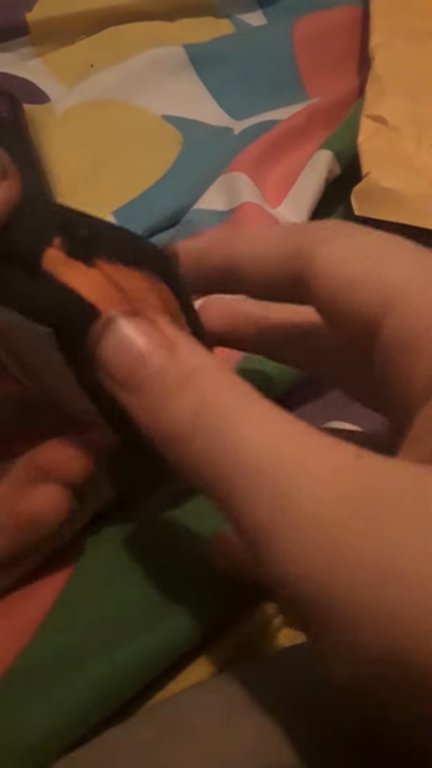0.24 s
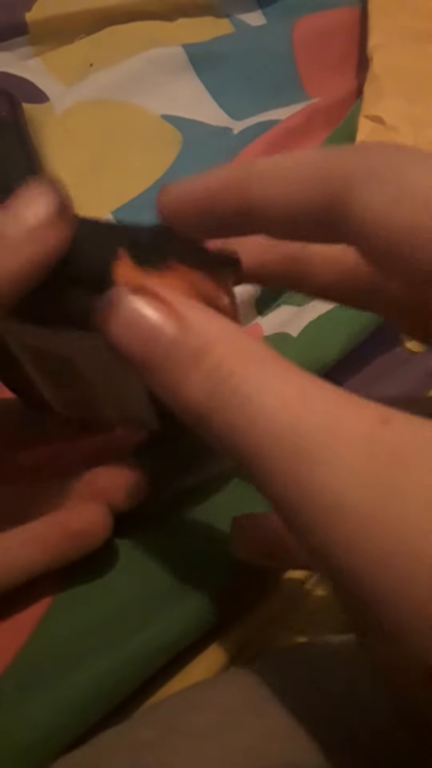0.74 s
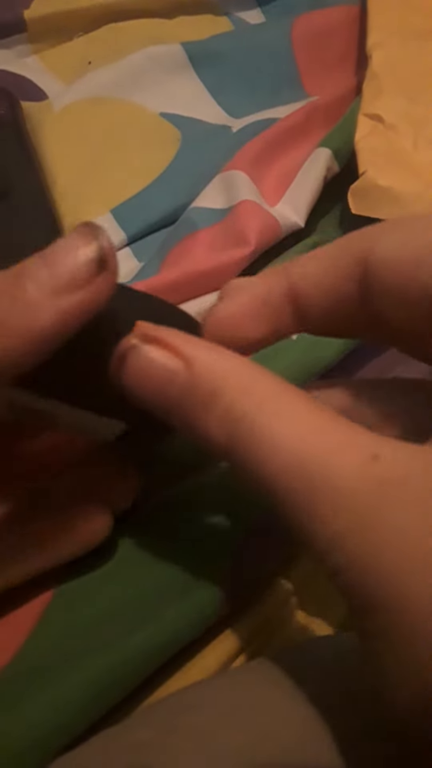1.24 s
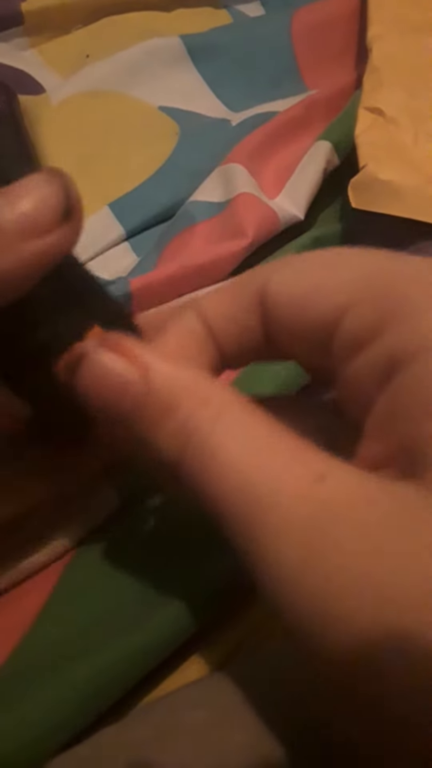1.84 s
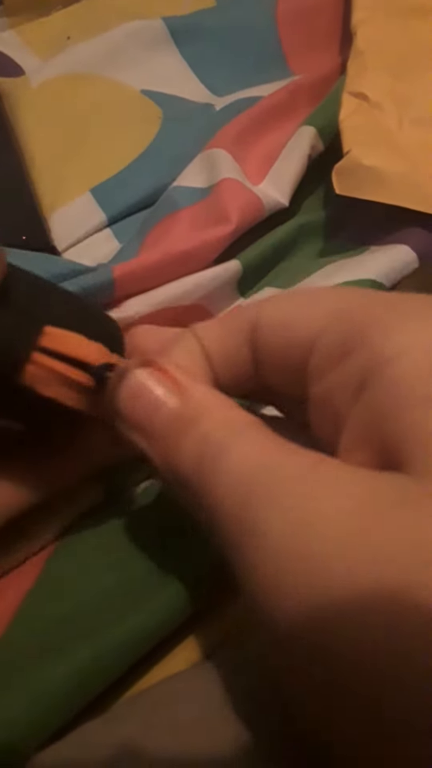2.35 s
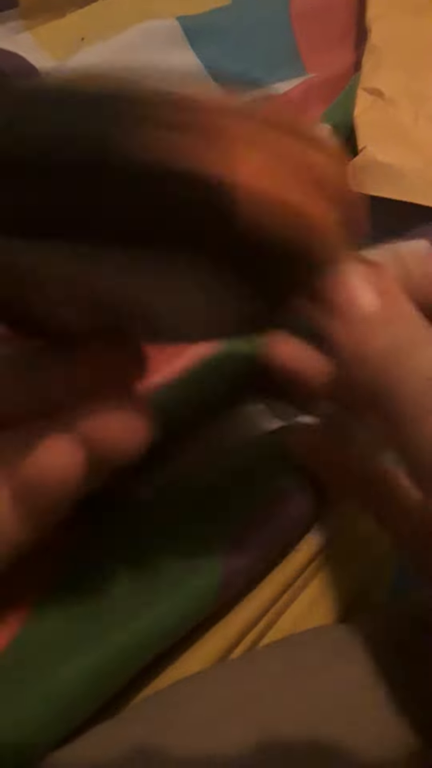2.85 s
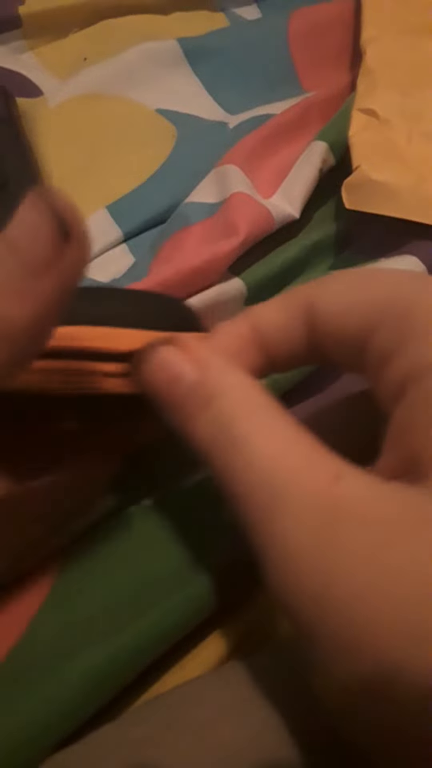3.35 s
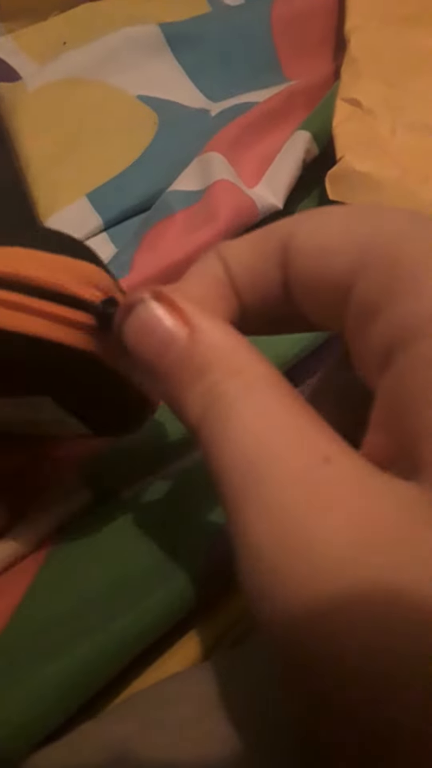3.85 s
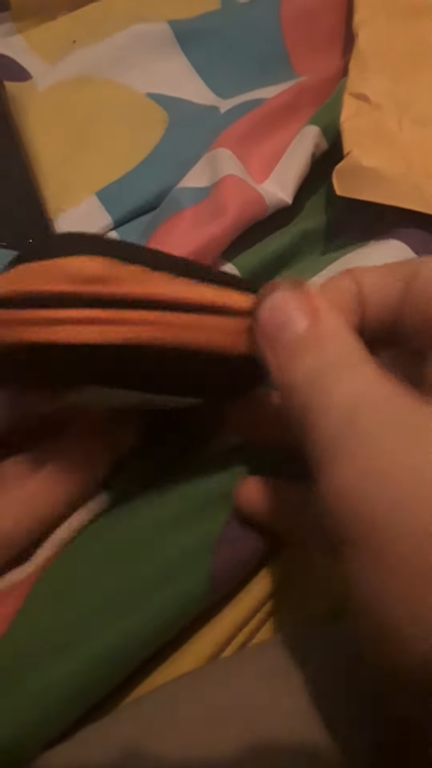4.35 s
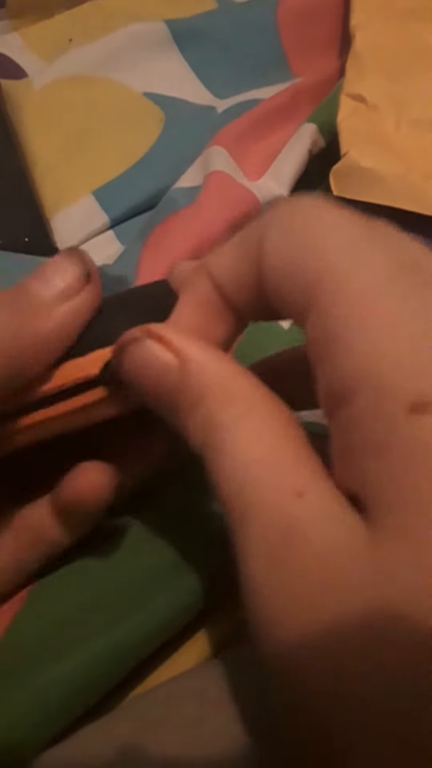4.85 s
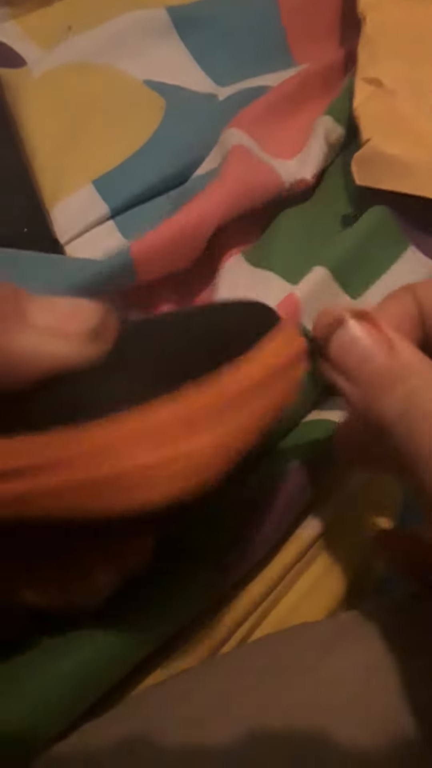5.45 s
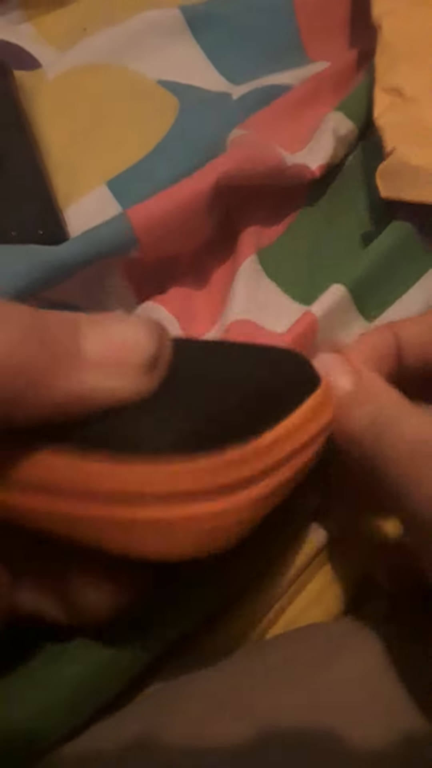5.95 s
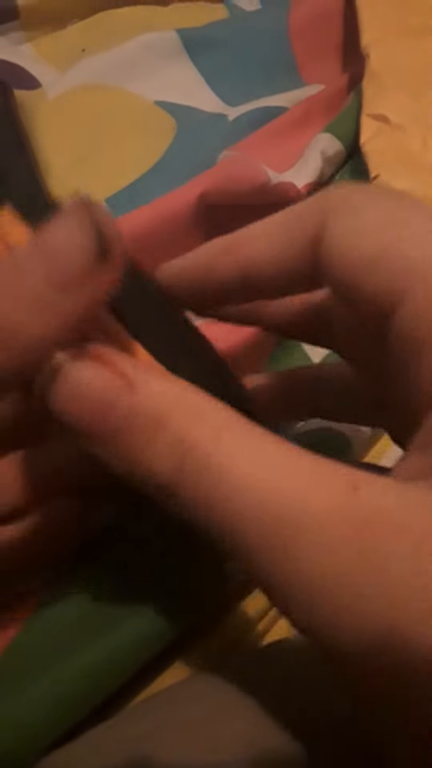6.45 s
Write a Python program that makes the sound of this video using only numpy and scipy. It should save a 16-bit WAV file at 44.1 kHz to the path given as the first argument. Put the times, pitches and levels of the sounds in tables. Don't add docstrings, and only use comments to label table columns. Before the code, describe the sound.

A fabric case handled close to the microphone indoors: fumbling clicks at once, over a second of quiet rubbing and small ticks, one crisp tap, then three halting zipper pulls about a second or more apart. The first is bright and strong, the second softer and quick, the third longer and gritty. Cloth scuffs and fingertip taps fill the gaps; rustling, creaking handling closes it over soft room rumble.

```python
import sys
import numpy as np
from scipy import signal
from scipy.fft import rfft, irfft
from scipy.io import wavfile
from scipy.ndimage import uniform_filter1d, map_coordinates

SR = 44100
rng = np.random.default_rng(int(sys.argv[2]) if len(sys.argv) > 2 else 0)


def nominal_scale(level):
    x = np.asarray(level, float) / 20
    return 10 ** x


def store_pcm(level_fs):
    pcm = np.round(np.clip(level_fs, -1, 1) * 32767).astype(np.int16)
    wavfile.write(sys.argv[1], SR, np.atleast_2d(pcm).T)


N = 295931


def zipper():
    # time_s, brace_db, wall_pitch_ratio
    grips = [
        [(2.21, -21, 1.1), (2.4, -15, 1.01), (2.44, 1, 1.2), (2.49, 6, 1.15), (2.55, 2, 1.3), (2.58, 9, 0.76),
         (2.625, 8, 0.8), (2.655, -2.5, 0.88), (2.72, 4, 1.3)],
        [(3.67, 5.5, .55), (3.72, 8, .55), (3.77, 0, 0.84), (3.85, -2, .58), (3.92, 1.5, .5), (3.96, 5, 0.69),
         (4, 2, 1.02), (4.022, 3, 1.6), (4.05, -4, 1.04)],
        [(5.15, -2, 1.3), (5.2, -11, 1.2), (5.24, 8, 0.69), (5.28, 0.5, .95), (5.36, -0.5, .85),
         (5.43, -6, 1.12), (5.5, 5, 1.35), (5.6, 5, 1.2), (5.64, 5, .95)],
    ]
    # time_s, tape_db, second_tape_db, slider_ring_db, pitch_ratio
    tape_lies = [
        [(2.21, -12, -3, -14, 1.), (2.3, -11, -1, -14, 1.), (2.4, -11, 3, -10, 1.), (2.46, -3, 3, 2, 1.),
         (2.5, 3, -1, -3, 1.1), (2.55, -2, 5, -4, 1.), (2.6, -4, 0, -2, 1.), (2.65, -8, 1, -6, .95),
         (2.72, -8, 2, -10, .95)],
        [(3.67, -5, -3, -1, 1.1), (3.72, -5, -1, 1, .95), (3.77, -6, 3, -6, .9), (3.82, -3, 6, -12, .95),
         (3.87, 0, 7, -12, 1.), (3.92, 1, 2, -6, 1.), (3.97, 3, 2, 2, 1.1), (4.01, 1.5, -1, -2, 1.2),
         (4.05, 1, -3, -8, 1.)],
        [(5.15, -4, 2, -14, 1.), (5.21, -4, 1, -12, 1.), (5.25, -8, 0, -5, .95), (5.29, 3, -8, 0, .98),
         (5.35, 2, -9, 1, .96), (5.44, 8, -9, 1, 1.), (5.49, 6, 6, 4, 1.), (5.55, 4, 6, 7, .95),
         (5.63, 2, 7, 7, .92)],
    ]
    # pitch_hz, level_db (per Hz)
    snap_colours = [
        [(2820, -78), (5000, -23), (7470, -0.5), (8000, 1), (8740, -3), (9850, -13), (14900, -40), (16700, -54)],
        [(2820, -44), (5000, -21), (8210, 5.5), (8920, -4.5), (9800, -17), (14300, -37), (16000, -45),
         (16700, -78)],
        [(2820, -30), (4800, -25), (6590, -10.5), (8210, 3), (9400, -14), (15200, -39), (16000, -35),
         (16700, -71)],
    ]
    # pitch_hz, width_hz
    case_modes = [
        [(366, 320), (753, 340), (1335, 430), (2250, 800), (3350, 1600), (6500, 1200)],
        [(400, 260), (790, 340), (1240, 380), (2400, 1400), (4300, 1300), (5600, 1800)],
        [(340, 750), (670, 420), (1250, 1000), (2800, 640), (5300, 1800), (11000, 3200)],
    ]
    # thump_db, wall_db, shell_db, tape_db, second_tape_db, slider_ring_db
    mean_knocks = [
        (-20, -21, -17.5, -23.5, -16.5, -8),
        (-20, -11, -20, -13, -20, -16),
        (-25, -16.5, -16, -13, -14.5, -18.5),
    ]
    slides = [
        (-36, -52.5, .3, .3, .4),
        (-35, -58, .35, .35, .2),
        (-38, -53, .45, .45, .1),
    ]
    grip_share = (.9, 1.07, .25, -.2, -0.037, 0)
    lag_share = 0.39
    hiss_power = 1.96
    out, t = 0, np.arange(N) / SR
    teeth = slider_teeth()
    pulls = zip(grips, tape_lies, mean_knocks, slides, snap_colours, case_modes)
    for grip, tape, knock_db, slide, snap, case in pulls:
        hiss_db, drag_db, burst_ms, rough, chatter = slide
        in_pull = abs(teeth[:, 0] - grip[4][0]) < .5
        s, db = teeth[in_pull].T
        brace_db, stretch = in_time(grip, s)
        case_db = np.c_[list(knock_db)] + np.outer(grip_share, brace_db) - lag_share * (db - db.mean())
        *tape_db, bow = in_time(tape, s)
        case_db[3:] += tape_db
        pitch_ratios = (1, stretch, 1, bow, bow, 1)
        modes = [(hz * ratio, width_hz) for (hz, width_hz), ratio in zip(case, pitch_ratios)]
        out = out + knocks(s, db + .4, case_db, snap, modes, burst_ms, rough, chatter,
                           detune=.022, rattle=.06, rattle_ms=1.3)
        passed = np.bincount((s * SR).astype(int), minlength=N) * SR / 300.
        speed = np.maximum(uniform_filter1d(uniform_filter1d(passed, size=700), size=700), 0)
        moving = (t > s.min()) & (t < s.max())
        flutter_db = 2 * drift(150)
        strain_db = drag_db + 4 * drift(30)
        friction = nominal_scale(hiss_db) * speed ** hiss_power + nominal_scale(strain_db) * moving
        rub = rng.standard_normal(N) * nominal_scale(flutter_db) * friction
        out = out + through(rub, response(snap) + 0.28 * resonance(*case[3], passes=1))
    return out


def slider_teeth():
    # time_s, level_db
    creep_first = [(2.213, -11.5), (2.2372, -35), (2.2552, -9), (2.2689, -9), (2.2793, -9.5), (2.2927, -8),
                   (2.3045, -34), (2.3301, -8.5), (2.3505, -32), (2.3529, -8), (2.3731, -7), (2.3895, -30),
                   (2.3952, -7), (2.4071, -7), (2.6355, -8), (2.6419, -8), (2.6517, -8), (2.6725, -8.5),
                   (2.6859, -12.5), (2.6971, -15.5), (2.716, -28)]
    creep_second = [(3.673, -32.5), (3.6837, -26.5), (3.6992, -26), (3.7076, -25), (3.7153, -26),
                    (3.724, -29), (3.7299, -25), (3.7405, -22), (3.755, -19), (3.7729, -21), (3.8166, -20),
                    (3.825, -21), (3.8407, -17.5), (3.8557, -19.5), (3.8643, -18.5), (3.8687, -27),
                    (3.8729, -21), (3.883, -22), (3.8993, -24), (3.9165, -25), (3.9207, -23), (3.9239, -19),
                    (3.9264, -27), (3.9303, -20), (3.9332, -24), (3.936, -17), (3.9388, -30), (3.9429, -19),
                    (3.9491, -19), (4.0463, -12.5)]
    creep_third = [(5.1528, -18), (5.1584, -15.5), (5.1684, -16), (5.1753, -16.5), (5.2, -11.5),
                   (5.2121, -16.5), (5.219, -12.5), (5.2235, -15), (5.2275, -14), (5.233, -16),
                   (5.2363, -16), (5.2398, -18), (5.3617, -10.5), (5.3721, -14.5), (5.3892, -8.5),
                   (5.3988, -8.5), (5.408, -9), (5.4223, -10.5), (5.4326, -8), (5.4506, -10.5), (5.459, -7),
                   (5.4682, -18), (5.4756, -20), (5.4839, -17), (5.4904, -15), (5.4994, -14), (5.5058, -14),
                   (5.5132, -12), (5.5208, -13), (5.5474, -16), (5.5915, -15.5), (5.5978, -31),
                   (5.6004, -14.5), (5.6064, -14), (5.6121, -13), (5.6175, -12), (5.6245, -14.5),
                   (5.6326, -22)]
    # time_s, level_db
    runs = [
        [(2.4162, -8.5), (2.437, -10), (2.4718, -10.5), (2.4892, -16)],
        [(2.5001, -19), (2.5081, -21), (2.5304, -14.5), (2.5537, -14), (2.5719, -12), (2.5858, -14.5),
         (2.5983, -11), (2.614, -8), (2.6299, -7)],
        [(3.9543, -18), (3.9696, -18), (3.9769, -24), (3.9827, -19), (3.9942, -14.5), (4.0044, -11.5),
         (4.0141, -13.5), (4.0297, -9)],
        [(5.2431, -17), (5.2514, -18), (5.2625, -14.5), (5.2752, -16), (5.2854, -22), (5.3005, -20.5),
         (5.328, -12), (5.3417, -10), (5.3555, -9.5)],
    ]
    run_counts = [
        [0, 4, 9, 11],
        [0, 1, 4, 8, 12, 16, 20, 25, 29],
        [0, 4, 6, 8, 12, 16, 20, 25],
        [0, 4, 8, 12, 15, 20, 28, 32, 36],
    ]
    running = [run_teeth(run, count) for run, count in zip(runs, run_counts)]
    return np.concatenate([creep_first, creep_second, creep_third] + running)


def run_teeth(run, count):
    knots = np.pad(np.c_[run, count], ((2, 2), (0, 0)), mode="reflect", reflect_type="odd")
    path = np.linspace(2, len(run) + 1, num=400)
    s, db, tooth = [map_coordinates(column, [path], order=3) for column in knots.T]
    whole = np.arange(count[-1] + 1)
    even = np.c_[np.interp(whole, tooth, s), np.interp(whole, tooth, db)]
    return even + rng.standard_normal((len(whole), 2)) * [.0001, 1.3]


def knocks(s, db, case_db, snap, case, burst_ms, rough, chatter, detune, rattle, rattle_ms):
    at, size = np.round(s * SR).astype(int), 300
    tick = response(snap)[:300]
    grain = signal.lfilter([.8], [1, -.6], rng.standard_normal((len(s), size)), axis=0)
    burst = rough * grain * np.exp(-np.arange(size) / (burst_ms * SR / 1000))
    burst[:, 0] = 1
    burst[:, [5, 11]] += chatter
    shaped = signal.oaconvolve(burst, tick[None], axes=1)
    energy = nominal_scale(db) / abs(tick).max()
    shaped *= (energy / np.linalg.norm(shaped, axis=1))[:, None]
    out = np.zeros(N + 4096)
    np.add.at(out, at[:, None] + np.arange(shaped.shape[1]), shaped)
    wander = np.transpose([drift(6)[at] for _ in case])
    bend = np.exp(detune * (rng.standard_normal((len(s), len(case))) + wander))
    case_db = case_db + 1.3 * (rng.standard_normal(bend.shape) + wander[:, ::-1]).T
    body = np.zeros((len(s), 2048))
    for k, (hz, width_hz) in enumerate(case):
        mode_hz = hz * bend[:, k]
        for i in range(len(s)):
            gain = energy[i] * nominal_scale(case_db[k][i]) * (-1) ** k
            body[i] += gain * resonance(mode_hz[i], width_hz)
    push = rattle * rng.standard_normal((len(s), size)) * np.exp(-np.arange(size) / (rattle_ms * SR / 1000))
    push[:, 0] = 1
    body = signal.oaconvolve(body, push / np.linalg.norm(push, axis=1)[:, None], axes=1)
    np.add.at(out, at[:, None] + np.arange(body.shape[1]), body)
    return out[:N]


def pull_tab():
    # time_s, peak_db
    jingles = [
        (0.1146, -52),
        (0.1745, -60),
        (6.0084, -58),
        (6.0182, -52),
        (6.0571, -54),
        (6.1165, -49),
        (6.3016, -72),
    ]
    tab_hz, t60_s = 13510, 0.098
    s, db = np.transpose(jingles)
    hits, t = np.zeros(N), np.arange(SR // 5) / SR
    hits[(s * SR).astype(int)] = nominal_scale(db)
    return through(hits, np.sin(2 * np.pi * tab_hz * t) * nominal_scale(-60 * t / t60_s))


def shell_lumps():
    # time_s, peak_db, pitch_hz, length_ms
    before = [(.083, -36, 2580, 3), (.204, -42, 1250, 3), (.472, -61, 1130, 3), (.599, -58, 1380, 3),
              (.882, -50, 1340, 3), (1.207, -54, 1190, 3), (1.22, -50, 1340, 3), (1.4495, -36, 3400, .6),
              (1.673, -59, 1380, 3), (1.755, -56, 980, 3), (1.87, -55, 1310, 4), (2.001, -54, 1360, 2),
              (2.059, -54, 1230, 3), (2.084, -51, 1100, 3)]
    # time_s, peak_db, pitch_hz, length_ms
    between = [(2.303, -45, 1360, 2), (2.761, -34, 1060, 2), (3.6002, -33, 2240, .5), (3.76, -38, 600, 1.5),
               (3.848, -36, 600, 1.5), (3.868, -35, 2300, 1.5), (3.877, -37, 2100, 1.5),
               (3.893, -36, 1900, 1.5), (4.206, -46, 1330, 2), (4.869, -42, 2580, 1.5),
               (5.7048, -28, 800, .9)]
    # time_s, peak_db, pitch_hz, length_ms
    after = [(5.907, -55, 929, 4), (5.929, -53, 856, 4), (5.957, -41, 1000, 3), (5.997, -43, 1030, 4),
             (6.0105, -33, 969, 1.5), (6.017, -38, 2750, 2), (6.059, -36, 2800, 2), (6.084, -41, 1700, 1.5),
             (6.094, -41, 1900, 1.5), (6.103, -39, 1100, 2), (6.118, -33, 1800, 2), (6.124, -36, 2900, 3),
             (6.136, -38, 2300, 2), (6.155, -46, 1090, 3), (6.19, -38, 1050, 4), (6.211, -33, 1550, .8),
             (6.23, -39, 1080, 2), (6.245, -45, 1400, 3), (6.26, -41, 1220, 4), (6.274, -43, 2200, 5),
             (6.301, -41, 1220, 3), (6.304, -46, 2400, 3), (6.363, -50, 1360, 4), (6.402, -43, 1320, 2),
             (6.421, -44, 1660, 4), (6.432, -44, 1400, 4), (6.444, -37, 1500, 2), (6.469, -42, 1340, 3),
             (6.482, -44, 1300, 3), (6.497, -42, 1500, 2), (6.504, -42, 1100, 3), (6.513, -42, 1350, 3),
             (6.523, -43, 1150, 3), (6.584, -50, 1410, 4), (6.625, -54, 1140, 4), (6.653, -50, 1040, 4),
             (6.669, -44, 950, 4), (6.678, -41, 1150, 4)]
    level_db, width_share, rise_share = -1.5, .55, .3
    out, ms = np.zeros(N + 4096), np.arange(-100, 1400) * 1000 / SR
    rows = np.concatenate([before, between, after])
    noises = rng.standard_normal((len(rows), len(ms)))
    for (s, db, hz, length_ms), noise in zip(rows, noises):
        fade_ms = np.clip(length_ms, .3, 12)
        puff = noise * np.exp(-abs(ms) / np.where(ms < 0, rise_share, 1) / fade_ms)
        ring = signal.fftconvolve(puff, resonance(hz, width_share * hz)[:600])
        start = max(round(s * SR) - 100, 0)
        out[start:start + len(ring)] += nominal_scale(db + level_db) * ring / abs(ring).max()
    return out[:N]


def fingers():
    # pitch_hz,
    # level_db (per Hz)
    rub_colour = [(2710, -52.5), (4600, -17), (5310, -12.5), (8280, 6.5), (10300, -20.5), (14900, -37.5),
                  (15900, -48), (16500, -58.5)]
    bright, shell, weave = strokes()
    crackle = (rng.random(N) < 250 / SR) * nominal_scale(2.9 * np.minimum(rng.exponential(1, N), 4))
    bursts = 1 + signal.lfilter([1], [1, -.97], crackle)
    out = 0
    for gain, h in ((bright, response(rub_colour)), (weave, resonance(2740, 2800, passes=1))):
        slips = rng.standard_normal(N) * bursts * nominal_scale(1.14 * drift(41))
        out = out + gain * through(rms_one(slips), h)
    # pitch_hz, level_db
    patches = [(380, -8.5), (850, -4), (1150, -1.5), (1400, -6), (1850, -17.0)]
    for hz, db in patches:
        slips = rng.standard_normal(N) * bursts * nominal_scale(4 * drift(25.5))
        out = out + shell * nominal_scale(db) * through(rms_one(slips), resonance(hz, 430))
    out = out + weave * nominal_scale(-3.5) * crunch()
    s, db, shell_db, tape_db = touches()
    ticks = knocks(s, db, [shell_db, tape_db], rub_colour, [(1080, 720), (2800, 1640)], burst_ms=0.99, rough=0.13,
                   chatter=.15, detune=.045, rattle=.11, rattle_ms=1.8)
    return out + room(ticks)


def strokes():
    # peak_s, fade_s (to fade by 20 dB), level_db, shell_press_db
    rubs = [(.38, 0.3, -65, -2), (.52, 0.02, -39, -25.5), (.6, 0.27, -65, -2), (.82, 0.02, -58, 2),
            (0.931, 0.04, -47.5, 3.5), (1.072, .09, -58.5, 5), (1.227, 0.0472, -46, -6.5),
            (1.7, 0.05, -55.5, -4.5), (1.781, 0.07, -53, 2), (1.94, 0.03, -48.5, -7),
            (2.089, 0.07, -49.5, -0.5), (2.7, 0.0531, -44, 3), (2.758, 0.0743, -29.5, -10),
            (2.9, 0.14, -44, -5), (2.999, 0.0752, -41.5, -5.5), (3.2, .2, -56.5, -7.5),
            (3.52, 0.28, -53.5, -5.5), (4.256, 0.1445, -44, 0), (4.5, .5, -61.5, 0.5), (5.12, 0.23, -59, 0),
            (5.66, 0.12, -51.5, -3.5), (5.921, .12, -52.5, 0), (6.05, 0.13, -49.5, 10),
            (6.196, 0.0945, -44, 8.5), (6.28, .08, -50, 11), (6.37, .03, -52.5, 0), (6.45, 0.13, -47.5, 11),
            (6.519, .07, -56, 13), (6.685, .08, -47.5, 9)]
    # peak_s, fade_s (by 20 dB), level_db, shell_press_db
    scuffs = [
        (.001, 0.045, -43, -3.5),
        (.055, .06, -52, 2),
        (.09, 0.06, -49.5, 4),
        (0.119, 0.054, -41.5, -2),
        (.185, 0.0947, -49.5, 4),
        (.246, 0.08, -49, 6.5),
        (.32, 0.12, -59, 8.5),
        (4.07, 0.14, -53, 0),
    ]
    rise_share, roundness = 0.93, 1.255
    rest_db = -74.5
    t = np.arange(0, N + 64, 64) / SR
    s, fade_s, db, press_db = np.transpose([*scuffs, *rubs])[:, :, None]
    from_peak_s = np.where(t < s, (s - t) / rise_share, t - s)
    fade_db = 20 * (from_peak_s / fade_s) ** roundness
    shell_db = db - .85 * fade_db - 16 + press_db
    db = db - fade_db
    weave_db = 1.28 * (db + 50) - 50.5 - 15 + 0.58 * press_db
    weave_db[:len(scuffs)] += 11
    sums = [np.linalg.norm(nominal_scale(layer_db), axis=0) for layer_db in (db, shell_db, weave_db)]
    bright, shell, weave = [np.interp(np.arange(N) / SR, t, gain) for gain in sums]
    return bright + nominal_scale(rest_db), shell + nominal_scale(rest_db - 15), weave


def crunch():
    per_s = 500
    sizes = nominal_scale(4.4 * np.minimum(rng.exponential(1, N), 4))
    snaps = (rng.random(N) < per_s / SR) * sizes * rng.choice([-1, 1], N)
    dealt = rng.integers(0, 8, N)
    out = 0
    for k, hz in enumerate(np.geomspace(850, 4300, num=8)):
        out = out + through(snaps * (dealt == k), resonance(hz, .3 * hz))
    return rms_one(out)


def touches():
    # time_s, peak_db, body_db (against the peak), hardness_db
    taps = [(1.4511, -13, -25, -1), (.8103, -34, -13, -19), (1.781, -37.5, 0, -29), (1.966, -46, -1, -26),
            (2.955, -31.5, 0.5, -12), (3.3076, -44, -5.5, 4.5), (3.379, -43, -4, -3),
            (3.6007, -33.5, -9, 1.5), (4.1305, -35.5, -7, 1.5), (4.7949, -29.5, -7, -3),
            (4.8483, -26.5, -15, 3), (4.8706, -30, -8.5, 1), (4.949, -15.5, -19, 3), (4.9586, -20, -21, 6),
            (5.705, -22, -9, -5), (6.0109, -31, -7, 2), (6.0193, -27, 0, -4), (6.0546, -32, 4, -8),
            (6.0588, -22.5, 0, -7.5), (6.0832, -39, -5, -5), (6.0977, -32, -5.5, -22),
            (6.1172, -17.5, -3, -7.5), (6.1327, -33, 5, -7), (6.3179, -33.5, 0, -5),
            (6.5996, -42.5, 1.5, -14), (6.6925, -24.5, -14, 3)]
    # time_s, peak_db, body_db (against the peak)
    fumbles = [(.0058, -32, -19), (.053, -35.5, -2), (.0571, -31.5, -2.5), (0.0902, -27, -8),
               (.094, -28, -1.5), (.1102, -15.5, -13), (0.1142, -15.5, -11.5), (0.1173, -4, -19.5),
               (.1251, -17, -21), (.1484, -23, -5.5), (0.1751, -14, -12.5), (.1812, -28.5, -8),
               (.2332, -12.5, -11.5), (0.2374, -19.5, -10), (0.253, -23, -5.5), (.2695, -33.5, -3),
               (.3168, -34.5, -5.5)]
    # time_s, peak_db
    nails = [(0.3478, -36), (.498, -31), (.6698, -44), (0.7401, -42.5), (.7449, -40.5), (.93, -37.5),
             (1.212, -33), (1.4493, -28), (1.5423, -41), (1.8502, -38), (1.9798, -37), (2.0016, -30),
             (2.0119, -31.5), (2.0312, -42), (2.192, -35.5), (3.3253, -38.5), (6.0714, -22), (6.6955, -28)]
    fumble_hard_db, nail_body_db, nail_hard_db = 2, -27, 3
    rows = [*taps]
    rows += [(*fumble, fumble_hard_db) for fumble in fumbles]
    rows += [(*nail, nail_body_db, nail_hard_db) for nail in nails]
    s, db, body_db, hard_db = np.transpose(rows)
    return s, db, body_db, body_db + hard_db


def skin():
    # (pitch_hz, width_hz)
    squeak_cue = (.507, 0.543, -53, [(1950, 750), (3620, 400)])
    # start_s, end_s, slips_per_s, level_db
    judder_cue = (1.051, 1.112, 94, -39)
    t = np.arange(N) / SR
    start, end, db, modes = squeak_cue
    swell = np.sin(np.pi * np.clip((t - start) / (end - start), 0, 1) ** 0.56)
    swell = swell * (1.35 + np.cos(2 * np.pi * 80 * (t - .514)))
    squeak = through(nominal_scale(db) * swell * rng.standard_normal(N), sum(resonance(*mode) for mode in modes))
    start, end, per_s, db = judder_cue
    slips = np.zeros(N)
    slips[(np.arange(start, end, 1 / per_s) * SR).astype(int)] = nominal_scale(db)
    return squeak + through(slips, resonance(1030, 540))


def background():
    # time_s, level_db
    rumble_levels = [(0, -60), (0.4, -62.5), (2, -64), (2.6, -54), (3.1, -60), (3.6, -57), (4.3, -57.5),
                     (4.9, -58.5), (5.3, -56.5), (5.62, -51.5), (5.8, -60), (6.7, -60.5)]
    # pitch_hz, level_db (per Hz)
    rumble_colour = [(21, -29.5), (35, -16), (75, 2.5), (180, -4), (228, -10.5), (474, -20.5), (900, -29),
                     (1760, -120)]
    # pitch_hz, level_db (per Hz)
    hiss_colour = [(350, -49), (600, -16), (1920, -8), (4610, -18.5), (7910, -1.5), (10000, -8),
                   (14600, -39), (16500, -36)]
    # time_s, pitch_hz
    whine_path = [(.15, 14160), (.42, 14270), (.65, 14140), (.9, 14390), (1.12, 14250), (1.4, 14420),
                  (1.7, 14230), (1.9, 14460), (2.2, 14270), (2.9, 14450), (3.3, 14230), (4.4, 14260),
                  (5.0, 14500), (5.9, 14370), (6.35, 14510), (6.71, 14430)]
    t = np.arange(N) / SR
    rumble = through(rng.standard_normal(N), response(rumble_colour, size=16384))
    rumble = nominal_scale(in_time(rumble_levels, t)[0]) * rumble
    hiss = nominal_scale(-74) * through(rng.standard_normal(N), response(hiss_colour))
    hz = uniform_filter1d(in_time(whine_path, t)[0], size=4000) + 30 * drift(30)
    whine = nominal_scale(-90) * np.sin(2 * np.pi * np.cumsum(hz) / SR)
    return rumble + hiss + whine


def room(x):
    t = np.arange(SR // 4) / SR
    h = nominal_scale(-45.5 - 60 * t / 0.11) * rng.standard_normal(len(t)) * (t > .002)
    h[0] = 1
    h[round(.0009 * SR)] += nominal_scale(-12)
    h[round(.0061 * SR)] += nominal_scale(-26)
    return through(x, h)


def response(spectrum, size=2048):
    hz, db = np.transpose(spectrum)
    grid = np.maximum(np.arange(size // 2 + 1) * SR / size, 1)
    cepstrum = irfft(np.interp(np.log(grid), np.log(hz), db) * np.log(10) / 20)
    cepstrum[1:size // 2] *= 2
    cepstrum[size // 2 + 1:] = 0
    return rms_one(irfft(np.exp(rfft(cepstrum)))) / np.sqrt(size)


def resonance(hz, width_hz, passes=2):
    r, out = np.exp(-np.pi * width_hz / SR), np.eye(1, 2048)[0]
    for _ in range(passes):
        out = signal.lfilter([1, 0, -1], [1, -2 * r * np.cos(2 * np.pi * hz / SR), r * r], out)
    return out / np.linalg.norm(out)


def through(x, h):
    return signal.oaconvolve(x, h)[:N]


def drift(rate):
    r = np.exp(-2 * np.pi * rate / SR)
    return rms_one(signal.lfilter([1], [1, -2 * r, r * r], rng.standard_normal(N + SR))[SR:])


def rms_one(x):
    return x / np.sqrt(np.mean(x ** 2) + 1e-20)


def in_time(rows, s):
    return [np.interp(s, np.array(rows)[:, 0], column) for column in np.transpose(rows)[1:]]


def scene():
    case = room(zipper() + pull_tab() + shell_lumps())
    return (case + fingers() + skin() + background())[None]


def roll_off(x):
    return signal.sosfilt(signal.butter(12, 16810, fs=SR, output="sos"), x)


def record(dry):
    mix = signal.sosfilt(signal.cheby2(12, 60, 16800, fs=SR, output="sos"), dry)
    return roll_off(mix)


dry = scene()
out = record(dry)
store_pcm(out)
```